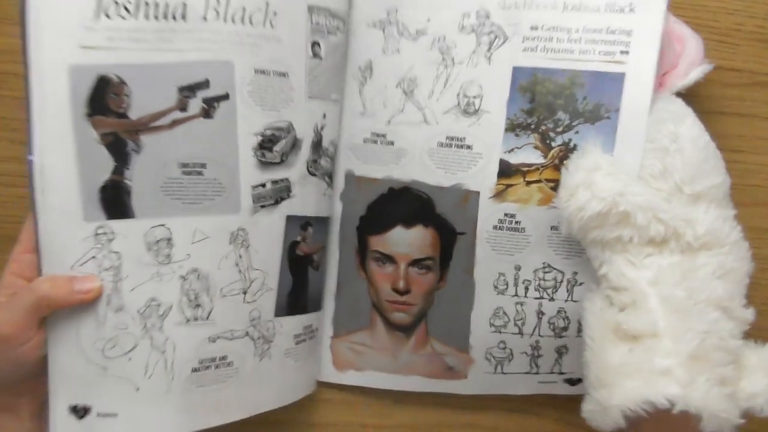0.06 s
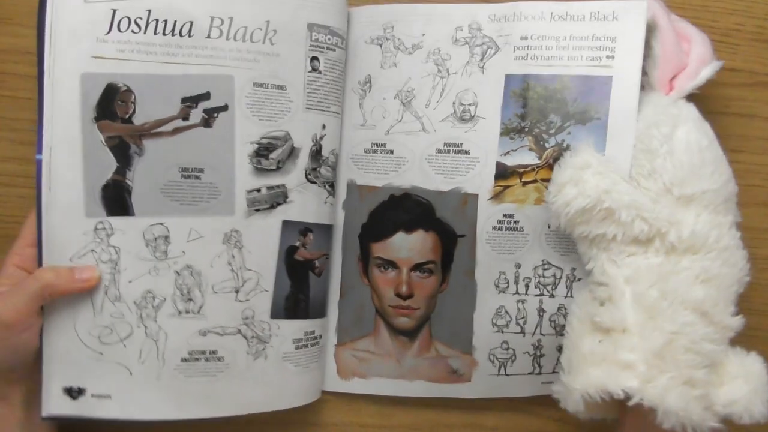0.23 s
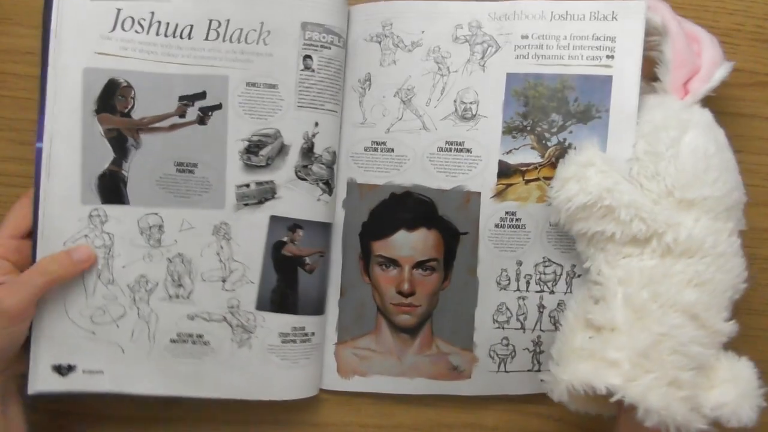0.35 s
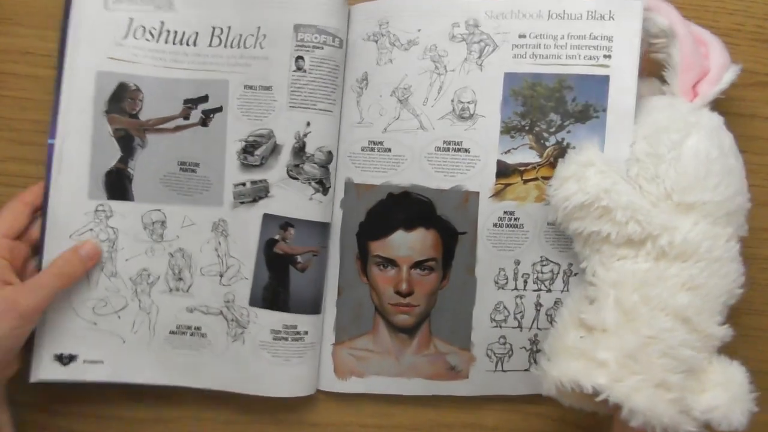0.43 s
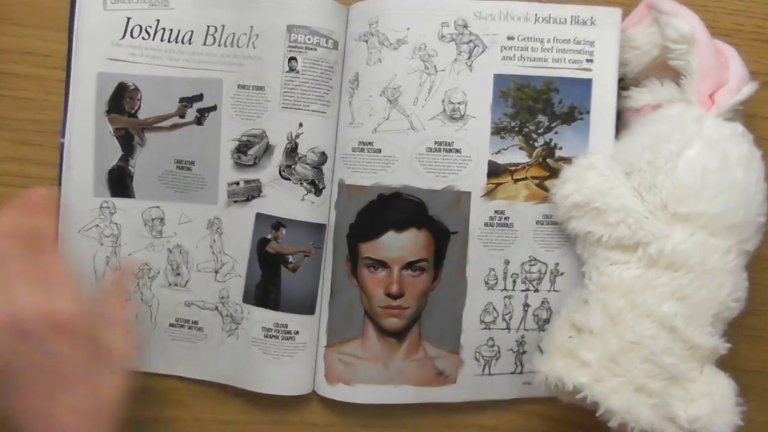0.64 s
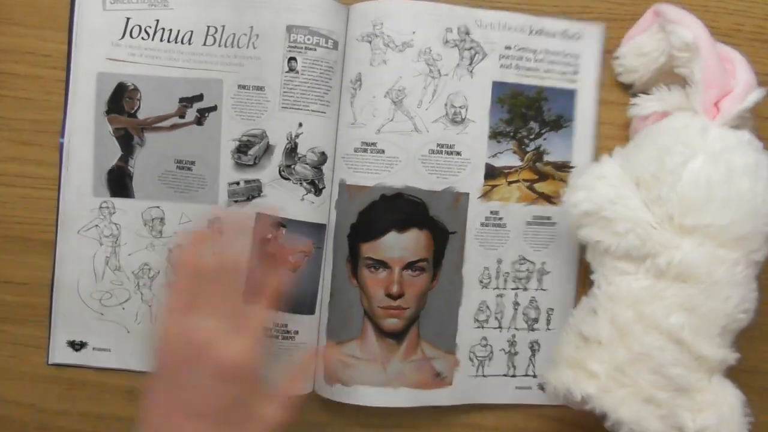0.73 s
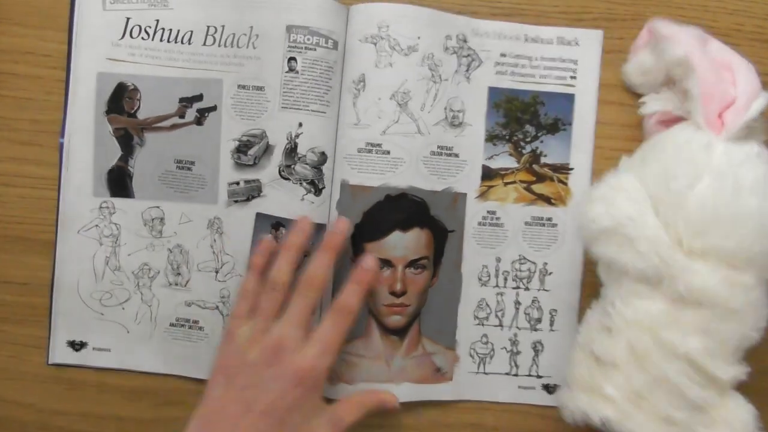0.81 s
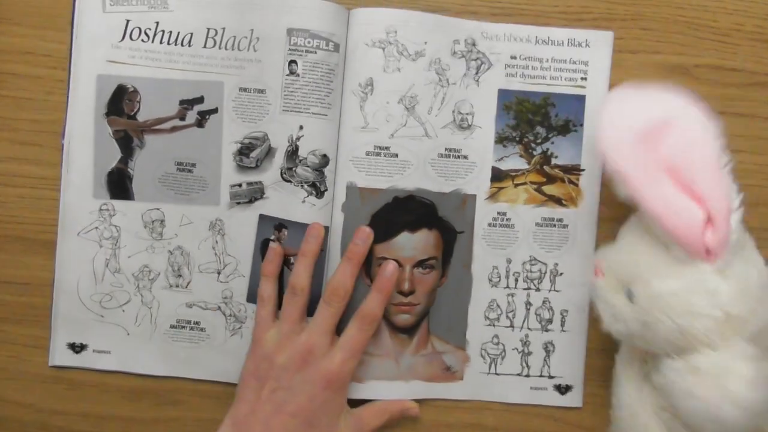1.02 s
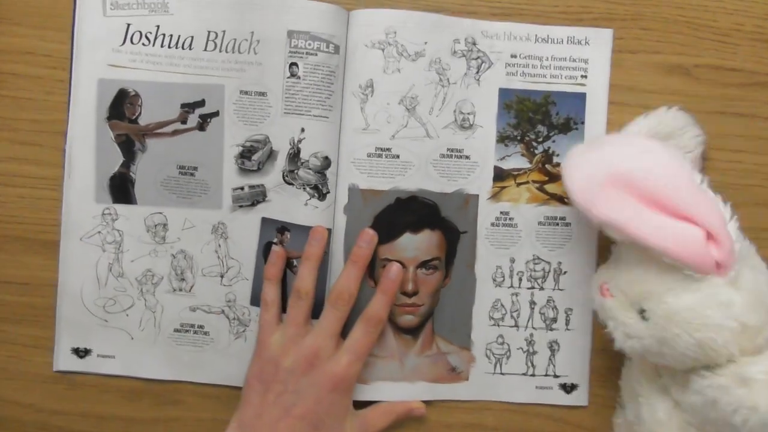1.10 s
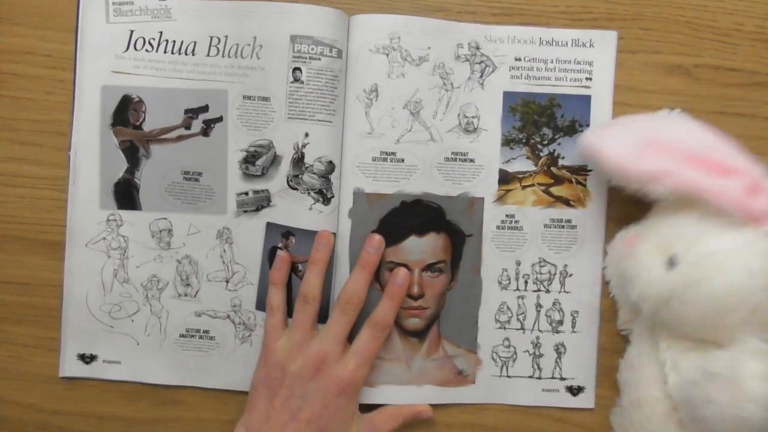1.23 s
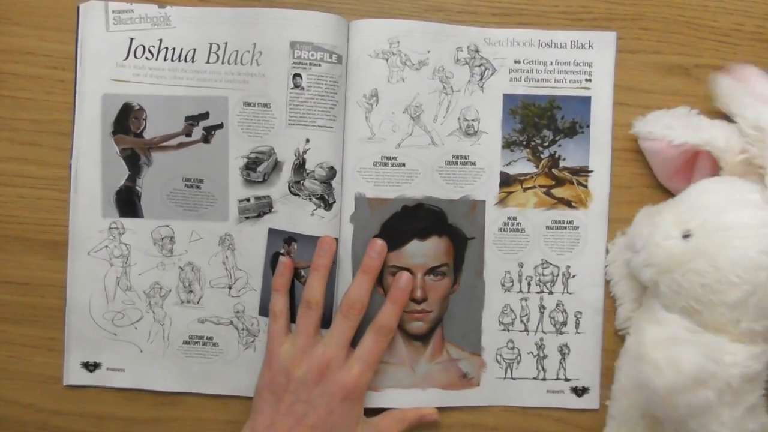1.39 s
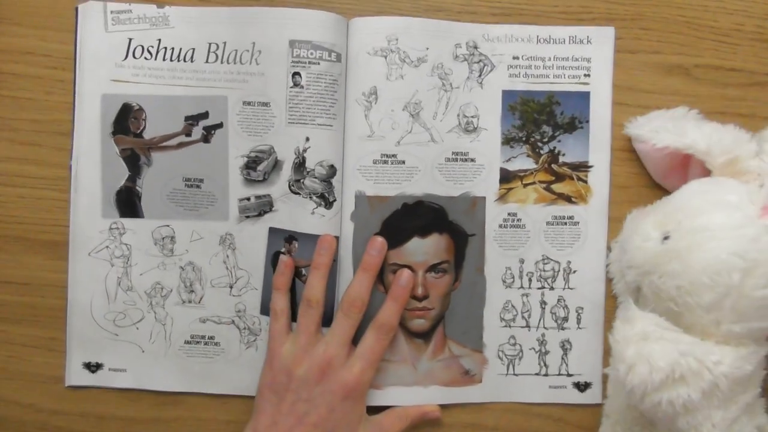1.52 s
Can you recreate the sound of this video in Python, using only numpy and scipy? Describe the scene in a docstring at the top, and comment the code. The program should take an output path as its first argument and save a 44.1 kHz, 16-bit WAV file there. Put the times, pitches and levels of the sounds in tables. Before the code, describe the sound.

In a small, quiet room, a magazine bumps and slaps sharply onto a wooden tabletop, echoing briefly. Soft paper swishes follow, then a lighter knock as a hand comes down, and a plush toy's faint brushing and tick.

```python
"""A light bump, then a sharp tap: an open magazine lands on a wooden table, one edge first, then the spine.
Each knock sets the tabletop ringing, the paper slaps flat, and the tap overloads the microphone.
The pages slide and settle with a hiss made of tiny slips, a hand comes down on them and rubs,
and a plush toy brushes and knocks beside them. The hits echo briefly in a small, quiet room."""
import sys
import numpy as np
from scipy import signal
from scipy.fft import rfft, irfft
from scipy.io import wavfile

SR = 44100
rng = np.random.default_rng(int(sys.argv[2]) if len(sys.argv) > 2 else 0)


def wav_record(signal):
    """Record a signal, one row per channel, as 16-bit PCM in the file named by sys.argv[1]."""
    frames = np.transpose(np.atleast_2d(signal))
    bounded = np.clip(frames, -1, 1)
    # unit amplitude maps onto the largest positive 16-bit level
    quanta = np.round(bounded * 32767).astype(np.int16)
    wavfile.write(sys.argv[1], SR, quanta)


N = 68355
T = np.arange(N) / SR


def from_db(db):
    """Turn decibels into a number to multiply by."""
    return 10 ** (np.asarray(db) / 20)


def loudness_curve(points):
    """Join (time_s, level_db) points into a volume that changes over time."""
    return from_db(np.interp(T, *np.transpose(points)))


def at_hz(rows, hz, column=1):
    """Look up a frequency in a table, blending between its rows."""
    rows = np.array(rows)
    return np.interp(np.log(hz + 1), np.log(rows[:, 0]), rows[:, column])


def shape_tone(x, tone):
    """Turn frequencies up or down by a table of (frequency_hz, gain_db)."""
    return irfft(rfft(x) * from_db(at_hz(tone, np.fft.rfftfreq(N, 1 / SR))), N)


def shape_noise(noise, tone):
    """Give a noise its tone, then set its average strength (rms) to 1."""
    shaped = shape_tone(noise, tone)
    return shaped / np.std(shaped)


def lowpass(x, hz):
    """Dull a sound by softening everything above hz."""
    return signal.sosfilt(signal.butter(2, min(hz, SR / 2 - 1000), fs=SR, output="sos"), x + 1e-18)


def decay(start_s, fade_s):
    """Start suddenly, then die away: every fade_s is the time to fall by 60 dB."""
    return (T >= start_s) * np.exp(-np.log(1000) * np.maximum(T - start_s, 0) / fade_s)


def ring(start_s, pitch_hz, fade_s):
    """One fading note of something struck."""
    return decay(start_s, fade_s) * np.sin(2 * np.pi * pitch_hz * (T - start_s))


# Tone of the quiet background: frequency_hz, gain_db
BACKGROUND_TONE = [(25, 9.5), (80, -1), (150, 3.5), (300, -1.5), (600, -9), (1000, -14), (1600, -23.5),
                   (3700, -33), (5000, -32.5), (8500, -21.5), (16000, -22)]
def background(level_db=-61.5):
    """A faint, steady rumble with a little hiss."""
    return from_db(level_db) * shape_noise(rng.standard_normal(N), BACKGROUND_TONE)


# First echoes to come back: delay_s, gain_db
ECHOES = [(.0065, -16), (.0112, -11)]
# The wash of sound that lingers in the room: frequency_hz, gain_db, fade_s
ROOM_TAIL = [(100, -6, .28), (246, -12.5, .25), (551, -19.5, 0.19), (1000, -5.5, 0.2), (1940, -6.5, 0.15),
             (3940, -14, .22), (8000, -22.5, 0.13), (15000, -38, .1)]
def room_echo(sound, echo_cutoff_hz=2900, tail_delay_s=.003, tail_rise_s=.005):
    """The room returns two dull echoes and a blurred tail that dies sooner in the treble."""
    echoes = sum(from_db(db) * np.interp(T - delay_s, T, sound, left=0) for delay_s, db in ECHOES)
    edges_hz = np.geomspace(70, 17000, 17)
    noises, tail = rng.standard_normal((2, N)), np.zeros(N)
    rise = np.clip((T - tail_delay_s) / tail_rise_s, 0, 1)
    for k, (low, high) in enumerate(zip(edges_hz, edges_hz[1:])):
        middle_hz = np.sqrt(low * high)
        band_filter = signal.butter(2, [low, high], "band", fs=SR, output="sos")
        band = signal.sosfilt(band_filter, noises[k % 2])
        band = band * rise * decay(0, at_hz(ROOM_TAIL, middle_hz, column=2))
        band *= np.sqrt(2 * (high - low) / SR / np.sum(band ** 2))   # wider bands get more energy
        tail += from_db(at_hz(ROOM_TAIL, middle_hz)) * band
    return lowpass(echoes, echo_cutoff_hz) + signal.fftconvolve(sound, tail)[:N]


def friction(tone, slips_per_s=3000, spread_db=2.5, hiss_gain=.7):
    """Surfaces rubbing together make countless tiny slips over a smooth hiss."""
    sizes = from_db(spread_db * np.minimum(rng.exponential(1, N), 4))
    directions = rng.choice([-1, 1], N)
    slips = sizes * directions * (rng.random(N) < slips_per_s / SR)
    hiss = hiss_gain * rng.standard_normal(N)
    return shape_noise(slips / np.std(slips) + hiss, tone)


# Loudness of the toy's brushing: time_s, level_db
TOY_LOUDNESS = [(1.05, -79), (1.15, -59), (1.22, -55), (1.31, -63), (1.42, -60), (1.55, -61)]
# Tone of plush on wood: frequency_hz, gain_db
TOY_TONE = [(60, -3), (300, -11.5), (650, -3.5), (1100, -12), (1650, -22), (2200, -12), (2800, -19.5),
            (3700, -14), (5000, -31), (7500, -15.5), (16000, -35)]
def toy_brushing():
    """The plush toy brushes softly over the table."""
    return loudness_curve(TOY_LOUDNESS) * friction(TOY_TONE)


# Loudness of the hand's rubbing: time_s, level_db
HAND_LOUDNESS = [(0, -92), (.3, -56), (.43, -54), (.6, -49.5), (.75, -55), (.82, -62.5), (.92, -63.5),
                 (1, -51.5), (1.1, -63), (1.55, -63)]
# Tone of skin on paper: frequency_hz, gain_db
HAND_TONE = [(40, -12.5), (150, 9), (280, -3), (550, 5.5), (900, -4.5), (1600, -15), (2800, -19.5),
             (3800, -19.5), (5000, -32), (7500, -35.5), (16000, -24.5)]
def hand_rubbing():
    """The hand drags on the magazine with a low, dull rustle."""
    return loudness_curve(HAND_LOUDNESS) * friction(HAND_TONE)


# Loudness of the sliding pages: time_s, level_db
PAGE_LOUDNESS = [(0, -73.5), (.34, -67), (.47, -60.5), (.497, -45.5), (.505, -38.5), (.513, -58),
                 (.61, -57.5), (.635, -50), (.648, -41.5), (.66, -50.5), (.671, -37), (.678, -54.5),
                 (.78, -58.5), (.83, -61.5), (.95, -62), (.975, -51.5), (1.1, -62.5), (1.55, -76.5)]
# Tone of sliding paper: frequency_hz, gain_db
PAGE_TONE = [(100, -24), (400, -18.5), (850, 2.5), (1600, -5.5), (2800, -9.5), (3800, -2.5), (5000, -15),
             (7000, 1.5), (9000, 1.5), (12000, -7.5), (16000, -19.5)]
def pages_sliding():
    """The pages slip in short, bright swishes as they settle."""
    return loudness_curve(PAGE_LOUDNESS) * friction(PAGE_TONE)


# Soft, heavy landings: start_s, level_db, pitch_hz, fade_s
THUDS = [(0.1658, -31, 157, 0.094), (0.2243, -21.5, 56.2, 0.042), (0.582, -41.5, 90, 0.04),
         (0.693, -45.5, 117, 0.13), (.851, -39.5, 163, 0.077), (1.025, -45.5, 78, 0.21),
         (1.027, -42.5, 142.3, 0.3)]
def soft_thuds():
    """The weight of magazine, palm and toy makes low bumps that die quickly."""
    return sum(from_db(db) * ring(start_s, pitch_hz, fade_s) for start_s, db, pitch_hz, fade_s in THUDS)


# Paper landing flat: start_s, level_db, fade_s, brightness_hz
SLAPS = [(0.1652, -54, 0.036, 11900), (.2248, -13.5, 0.0083, 18600), (0.228, -29, 0.08, 3550),
         (0.5026, -37.5, 0.017, 6940), (0.5068, -47, 0.012, 11000), (0.531, -43, 0.024, 4530),
         (0.667, -57, 0.0066, 15000), (0.8419, -31.5, 0.027, 11400), (0.8486, -69, 0.021, 9000)]
# Tone laid over all the slaps: frequency_hz, gain_db
SLAP_TONE = [(120, -32), (500, 17.5), (1000, 4.5), (2000, 5.5), (2600, 1), (3800, 7.5), (5100, -4.5),
             (6800, 10), (8200, 8.5), (9300, -4), (10400, 6), (13000, -8), (16000, -4)]
def paper_slaps(snap_over_hiss_db=13.5):
    """Sheets meeting flat give one snap, then a short hiss as the rest of the paper follows."""
    noise, slaps = rng.standard_normal(N), np.zeros(N)
    for start_s, level_db, fade_s, brightness_hz in SLAPS:
        snap = from_db(snap_over_hiss_db) * (np.arange(N) == int(start_s * SR))
        hiss = noise * decay(start_s, fade_s)
        slaps += from_db(level_db) * lowpass(snap + hiss, brightness_hz)
    return shape_tone(slaps, SLAP_TONE)


# The tabletop's own notes: pitch_hz, level_db, fade_s
TABLETOP_NOTES = [(143, -8, 0.32), (350, -38, 0.18), (457.2, -16, 0.12), (544, -42.5, 0.1),
                  (627.3, -21.5, 0.083), (648.8, -33.5, 0.35), (748, -20, 0.11), (837.4, -27, 0.077),
                  (1088.5, -19, 0.075), (1210, -35.5, .1), (1388, -30.5, 0.089)]
def tabletop_ring(start_s, rise_cycles=4.7):
    """Each note of the struck wood builds up as the wave crosses the top, then fades."""
    age_s = np.maximum(T - start_s, 0)
    notes = np.zeros(N)
    for pitch_hz, level_db, fade_s in TABLETOP_NOTES:
        rise = 1 - np.exp(-age_s * pitch_hz / rise_cycles)
        notes += from_db(level_db) * ring(start_s, pitch_hz, fade_s) * rise
    return notes


# Knocks on the table: start_s, level_db, pitch_hz, fade_s, brightness_hz, tabletop_db
# tabletop_db sets the wood's ringing relative to its knock. The loudest row is the spine landing.
KNOCKS = [(0.1645, -13, 620, 0.01, 697, -5), (0.2244, 5.5, 565.3, 0.02, 2070, -4),
          (.5322, -32.5, 604, 0.038, 1800, -7), (.5825, -35.5, 376, 0.022, 700, 6),
          (.6895, -28, 594, .04, 700, -35), (.8397, -29.5, 668, 0.043, 1790, 8.5),
          (.8492, -15.5, 496, 0.02, 900, -0.5), (.851, -36, 342, 0.12, 497, 1),
          (1.3277, -27.5, 665, 0.018, 1570, -16), (1.3283, -29.5, 1167, 0.016, 1550, -16.5)]
def table_knocks(bass_cutoff_hz=324):
    """Each contact gives a short woody knock and sets the tabletop ringing; soft contacts are duller."""
    knocks = np.zeros(N)
    for start_s, level_db, pitch_hz, fade_s, brightness_hz, tabletop_db in KNOCKS:
        knock = ring(start_s, pitch_hz, fade_s)
        wood = from_db(tabletop_db) * tabletop_ring(start_s)
        knocks -= from_db(level_db) * lowpass(knock + wood, brightness_hz)
    # The tabletop is poor at passing low notes to the air.
    return signal.sosfilt(signal.butter(2, bass_cutoff_hz, "high", fs=SR, output="sos"), knocks)


def scene():
    """Add the hits, the rustling, the background and the hits' echo into one channel."""
    hits = table_knocks() + soft_thuds() + paper_slaps()
    rustle = pages_sliding() + hand_rubbing() + toy_brushing()
    return (hits + rustle + background() + room_echo(hits))[None]


def record(dry):
    """The microphone loses the deepest bass, flattens the loudest peaks and cuts the highest treble."""
    lowest_hz, highest_hz, peak_limit = 24, 16000, .71
    thinned = signal.sosfilt(signal.butter(1, lowest_hz, "high", fs=SR, output="sos"), dry)
    clipped = np.clip(thinned, -peak_limit, peak_limit)
    return signal.sosfiltfilt(signal.ellip(10, .05, 70, highest_hz, fs=SR, output="sos"), clipped)


dry = scene()
out = record(dry)
wav_record(out)
```